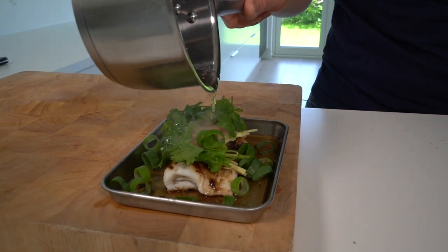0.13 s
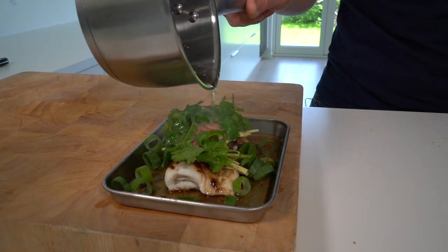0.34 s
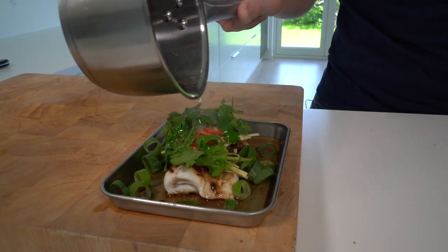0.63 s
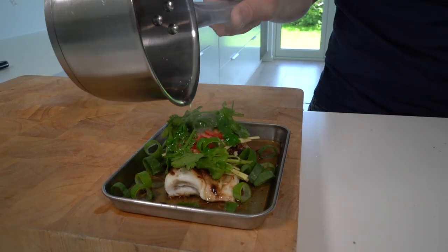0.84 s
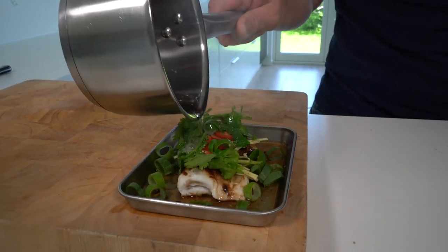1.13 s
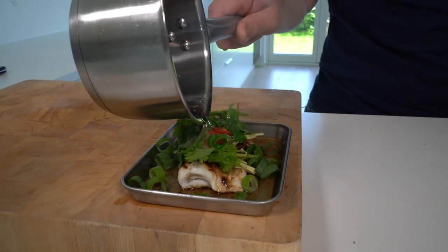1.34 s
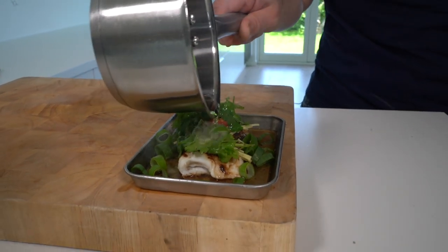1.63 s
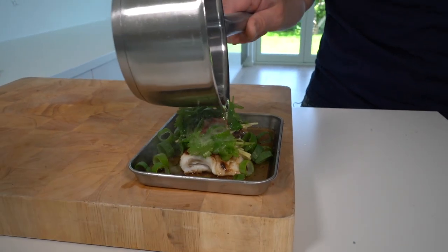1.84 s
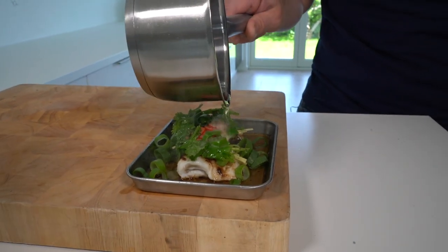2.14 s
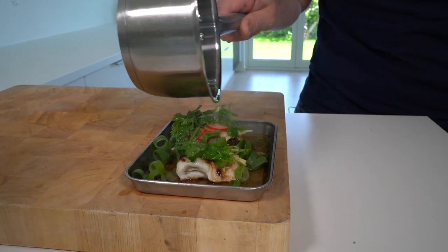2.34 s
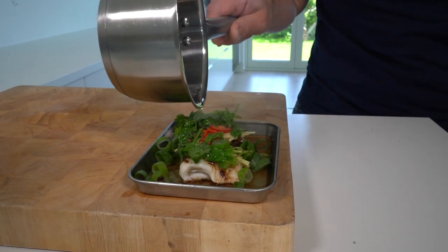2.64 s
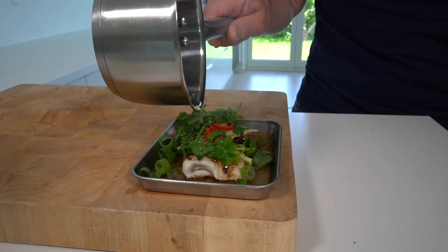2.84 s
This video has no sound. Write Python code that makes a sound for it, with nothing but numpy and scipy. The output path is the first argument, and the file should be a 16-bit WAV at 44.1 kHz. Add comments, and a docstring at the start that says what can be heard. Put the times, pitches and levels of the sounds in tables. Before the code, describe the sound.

Close by in a kitchen, hot oil sizzles on fresh herbs in a metal tray. It flares quickly into hissing and loud pops, eases off, then swells again several times with fine crackle and scattered spits.

```python
"""A kitchen with a low hum, where hot oil is poured from a saucepan over wet herbs on a steel tray.
Water flashes to steam in several surges: a thin hiss, and fine fizz, coarser crackle and loud pops
made of pulses about one cycle long. The tray mirrors every pulse, the pan above rings faintly,
and the room answers with a short tail."""
import sys
import numpy as np
from scipy import signal
from scipy.fft import rfft, irfft
from scipy.io import wavfile

SR = 44100
rng = np.random.default_rng(int(sys.argv[2]) if len(sys.argv) > 2 else 0)


def transcribe(signal):
    """Save signal, clipped to [-1, 1], as a 16-bit WAV file at the path in sys.argv[1]."""
    frames = np.atleast_2d(signal).T
    limited = np.clip(frames, -1, 1)
    pcm = np.round(limited * 32767).astype(np.int16)
    wavfile.write(sys.argv[1], SR, pcm)


N = 132300
SPOTS = 7  # places on the tray, one track each


def undb(db):
    """Decibels to gain."""
    return 10 ** (np.asarray(db) / 20)


def unit(x):
    """Scale to an energy of one."""
    return x / np.sqrt(np.sum(x ** 2) + 1e-18)


def fade(t, t60):
    """Exponential decay, 60 dB in t60 seconds."""
    return np.exp(-np.log(1000) * t / t60)


def noise(kind, hz, shape):
    """White noise through a gentle low-pass or high-pass."""
    return signal.sosfilt(signal.butter(2, hz, kind, fs=SR, output="sos"), rng.standard_normal(shape))


def colour(x, points, size=8192):
    """Minimum-phase EQ through (f/Hz, level/dB) points."""
    hz, db = np.array(points, float).T
    grid = np.maximum(np.fft.rfftfreq(size, 1 / SR), 1)
    gain = undb(np.interp(np.log(grid), np.log(hz), db))
    cepstrum = irfft(np.log(gain))
    cepstrum[1:size // 2] *= 2
    cepstrum[size // 2 + 1:] = 0
    return signal.fftconvolve(x, irfft(np.exp(rfft(cepstrum))))[:len(x)]


def place(pulses, start, spot):
    """Lay pulses out in time, one track for each spot on the tray."""
    index = start[:, None] + np.arange(pulses.shape[1])
    slots = spot[:, None] * N + index % N
    tracks = np.bincount(slots.ravel(), (pulses * (index < N)).ravel(), SPOTS * N)
    return tracks.reshape(SPOTS, N)


def room_tone(hum_hz=92.6):
    """A bed of faint rumble and the hum of an appliance."""
    # spectrum of still kitchen air: f/Hz, relative level/dB
    air_spectrum = [(48, 11.5), (68, -3), (170, -5.5), (400, 4), (2000, -22), (16000, -34)]
    air = unit(colour(rng.standard_normal(N), air_spectrum)) * np.sqrt(N)
    hum = np.sqrt(2) * np.sin(2 * np.pi * hum_hz * np.arange(N) / SR)
    return undb(-72) * air + undb(-85) * hum


def kitchen(split_hz=5000, echoes_per_s=700):
    """Response from one spot: direct sound, a short tail, sparse near echoes and the ringing pan."""
    # modes of the steel pan: f/Hz, level/dB
    pan_modes = [(884, -22), (1014, -22), (2020, -29), (2120, -31), (2518, -32), (2660, -33), (3133, -33),
                 (5135, -31)]
    t = np.arange(SR // 2) / SR
    late = t > .003  # pre-delay
    response = undb(-8.5) * unit(noise("low", split_hz, len(t)) * late * fade(t, t60=.4))
    response += undb(-11.5) * unit(noise("high", split_hz, len(t)) * late * fade(t, t60=.6))
    echoes = rng.standard_normal(len(t)) * (rng.random(len(t)) < echoes_per_s / SR)
    response += undb(-9) * unit(echoes * late * fade(t, t60=.06))
    for hz, db in pan_modes:
        response += undb(db) * unit(np.cos(2 * np.pi * (hz * t + rng.random())) * fade(t, t60=.2))
    response[0] += 1  # direct sound
    return response


def leaves_and_tray(size=256):
    """Response of one spot: leaves scatter a pulse, tray and board return it within about a millisecond."""
    # reflections off tray and board: delay/ms, gain
    mirrors = [(0.37, 0.3), (0.95, 0.28)]
    t = np.arange(size) / SR
    response = undb(-6.5) * unit(rng.standard_normal(size) * fade(t, t60=.006) * (t > 0))
    stretch = 1 + .12 * (2 * rng.random() - 1)  # each spot has its own path lengths
    for ms, gain in mirrors:
        response += gain * np.sinc((t - stretch * ms / 1000) * SR)
    response[0] += 1  # direct sound
    return response


def wandering_treble(x):
    """Two treble bands rise and sink by a few decibels as the pour wanders."""
    # band centres: f/Hz
    centres = [4530, 6900]
    # EQ moves: t/s, lower band level/dB, upper band level/dB
    moves = [(.1, 2.5, 1), (.45, -2.5, 5.5), (.72, 0.5, 2.5), (1.12, 1, -2), (1.5, -2, 3), (1.95, -2.5, 0),
             (2.45, -2, 5), (2.95, 2.5, 1)]
    when, *levels = np.array(moves).T
    for hz, db in zip(centres, levels):
        band = signal.lfilter(*signal.iirpeak(hz, Q=4.5, fs=SR), x)
        gain = undb(np.interp(np.arange(N) / SR, when, db))
        x = x + (gain - 1) * band
    return x


def burst(hz, q, rise_cycles, size=160):
    """Bursting steam bubbles, one row each: a pressure swing that builds fast and dies in about q cycles."""
    cycles = np.minimum(hz, SR / 2 - 1000)[:, None] * np.arange(size) / SR
    attack = 1 - np.exp(-cycles / rise_cycles)
    swing = np.sin(2 * np.pi * cycles) * np.exp(-np.pi * cycles / q) * attack
    return swing / np.linalg.norm(swing, axis=1, keepdims=True)


def swarm(level_db, per_s, centre_hz, spread_db, q=1.4, octaves=.77):
    """Random small bursts of many pitches; a harder boil makes them both denser and bigger."""
    usual_db, rate_share = -47, .36  # level at which the rate is per_s; share of a dB rise due to density
    rate = per_s * undb(level_db - usual_db) ** (2 * rate_share)
    sizes = undb(spread_db * np.minimum(rng.standard_normal(N), 2)) * rng.choice([-1, 1], N)
    sizes *= undb(level_db) * np.sqrt(SR / rate / np.mean(sizes ** 2))
    hz = centre_hz * 2 ** (octaves * (2 * rng.random(N) - 1))
    spot = rng.integers(SPOTS, size=N)
    start = np.flatnonzero(rng.random(N) < rate / SR)
    return place(sizes[start, None] * burst(hz[start], q, rise_cycles=.2), start, spot[start])


def sizzle():
    """Crackle, spits, fizz and steam swell as oil meets fresh leaves; rounder bubbles grow as it pools."""
    # how hard the water boils off: t/s, crackle drive level/dB, fizz drive level/dB
    boil = [(0, -53, -50.5), (0.2, -54, -49), (0.347, -34.5, -37.5), (0.418, -35, -38), (0.469, -46.5, -44),
            (0.529, -47, -45.5), (0.582, -49, -46), (0.71, -52.0, -46), (0.75, -49.5, -48.5),
            (0.808, -50, -48.5), (0.902, -63, -54.5), (1.019, -63, -55), (1.071, -42, -40.5),
            (1.149, -48, -47), (1.25, -58, -55), (1.38, -64, -56), (1.45, -66, -53), (1.52, -52, -49.5),
            (1.6, -60, -42.5), (1.65, -55.5, -50), (1.868, -41, -44), (1.97, -50.5, -47),
            (2.099, -45, -45.5), (2.308, -48, -50.0), (2.356, -41, -38), (2.42, -43, -43.5),
            (2.503, -42, -38), (2.57, -49, -46.5), (2.73, -51, -47.5), (2.83, -55, -55.5),
            (2.869, -47, -51), (2.941, -61, -58.5), (3.0, -48.5, -56.5)]
    t = np.arange(N) / SR
    when, *levels = np.array(boil).T
    crackle_db, fizz_db = (np.interp(t, when, db) for db in levels)
    crackle = swarm(crackle_db, per_s=500, centre_hz=3020, spread_db=6)
    spits = swarm(crackle_db, per_s=85, centre_hz=3600, spread_db=2.5)
    bubbles = swarm(crackle_db, per_s=110, centre_hz=2000, spread_db=2.5, q=5, octaves=.3)
    fizz = swarm(fizz_db, per_s=1200, centre_hz=6870, spread_db=6.5)
    steam = undb(fizz_db - 13) * noise("high", hz=4000, shape=(SPOTS, N)) / np.sqrt(SPOTS)
    pooling = undb(-14 + 2.5 * t)  # climbs 2.5 dB a second
    return undb(-7.5) * crackle + undb(-4.5) * spits + pooling * bubbles + undb(-3.5) * fizz + steam


def pops():
    """Larger drops of water explode one at a time, here and there on the tray: some thud, some ring."""
    # exploding drops: t/s, level/dB, f/Hz, Q (under 1 a thud, over 2 a ringing tick)
    drops = [(0.1774, -21, 2300, 0.8), (0.2334, -18.0, 5900, 1.3), (0.258, -10, 3200, 0.7),
             (0.2869, -13.5, 3500, 1.3), (0.3602, -4.5, 2700, 0.9), (0.3828, -7.5, 2300, 0.9),
             (0.3967, -7, 3900, 0.8), (0.3989, -5.5, 5100, 0.8), (0.4218, -8.5, 4100, 1.0),
             (0.4364, -10.0, 2700, 0.6), (0.4803, -14.5, 4300, 0.6), (0.5019, -12.5, 5100, 0.6),
             (0.5366, -9, 2500, 1.0), (0.5538, -21.0, 9000, 0.8), (0.6619, -21.0, 9000, 1.7),
             (0.6814, -16.0, 4100, 2.2), (0.6984, -14.5, 3700, 2.2), (0.712, -17.0, 4300, 1.0),
             (0.7876, -9, 3500, 1.3), (0.7957, -17.5, 4300, 2.2), (0.806, -18.0, 3000, 1.7),
             (0.8113, -17.5, 3700, 0.6), (0.8401, -22.0, 8500, 1.3), (0.8451, -16.5, 7300, 1.3),
             (0.9709, -21.0, 3700, 1.0), (1.0334, -18.5, 4300, 1.0), (1.0534, -14.0, 3900, 1.3),
             (1.0663, -13.0, 3900, 0.6), (1.1174, -16.0, 3300, 0.8), (1.1531, -16, 4600, 1.0),
             (1.2075, -14, 4300, 0.8), (1.2954, -19, 2200, 0.7), (1.4006, -16, 3000, 0.9),
             (1.4095, -21.0, 2300, 0.6), (1.4623, -19.0, 5300, 0.6), (1.5509, -21.5, 1300, 0.6),
             (1.5823, -13, 3300, 0.8), (1.6052, -14.0, 3000, 1.3), (1.6131, -13.0, 3500, 0.6),
             (1.6786, -11.0, 3700, 1.0), (1.6859, -18.0, 4100, 1.7), (1.7225, -14.5, 9000, 1.3),
             (1.7479, -12.5, 3300, 1.0), (1.8259, -17.5, 3900, 1.7), (1.8621, -10.5, 2100, 0.6),
             (1.9104, -15.5, 3500, 1.3), (2.0398, -12, 4100, 0.8), (2.0858, -16.0, 4100, 1.3),
             (2.2393, -16.5, 2800, 0.8), (2.3468, -11.5, 4600, 0.6), (2.373, -8.5, 3200, 0.6),
             (2.4542, -11.0, 3500, 0.8), (2.5089, -13.0, 4100, 0.8), (2.5126, -14.5, 2700, 2.2),
             (2.6225, -9.5, 2100, 1.2), (2.7204, -16.0, 8500, 1.0), (2.7459, -16.0, 3700, 2.2),
             (2.8508, -15.5, 4100, 2.2), (2.8661, -16.5, 2200, 0.6)]
    when, db, hz, q = np.array(drops).T
    pulses = undb(db)[:, None] * burst(hz, q[:, None], rise_cycles=.25)
    return place(pulses, (when * SR).astype(int), np.arange(len(when)) % SPOTS)


def scene():
    """Every spot on the sizzling tray reaches the listener by its own paths, over the room tone."""
    # tone of the bursts at the listener: f/Hz, level/dB
    burst_eq = [(60, -36.5), (160, -16), (235, -20), (300, -7.5), (430, -5), (520, -3.5), (680, 3),
                (950, -4), (1300, -3.5), (1600, 0.5), (2100, -5), (3500, -2.5), (4600, -1), (5400, -2),
                (8000, -1), (9500, 0.5), (11000, -4), (13800, -1.5), (15400, -2)]
    heard = np.zeros(N)
    for track in sizzle() + pops():
        paths = signal.fftconvolve(leaves_and_tray(), kitchen())
        heard += signal.fftconvolve(track, paths)[:N]
    return (wandering_treble(colour(heard, burst_eq)) + room_tone())[None]


def record(dry):
    """A steep low-pass takes off the very top."""
    top_hz = 15850
    return signal.sosfilt(signal.ellip(10, .2, 80, top_hz, fs=SR, output="sos"), dry)


dry = scene()
out = record(dry)
transcribe(out)
```